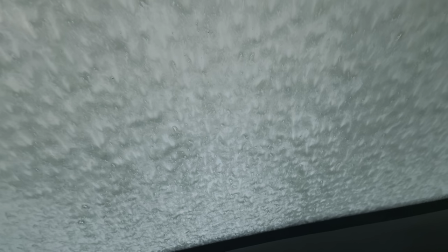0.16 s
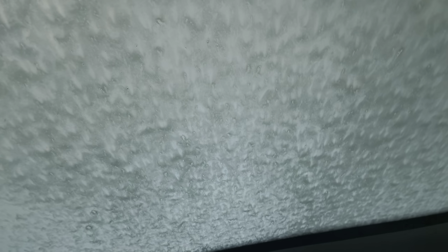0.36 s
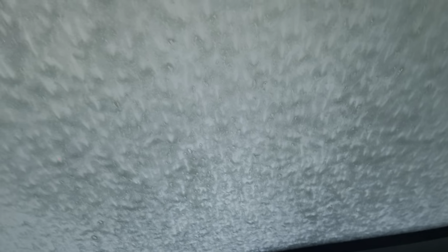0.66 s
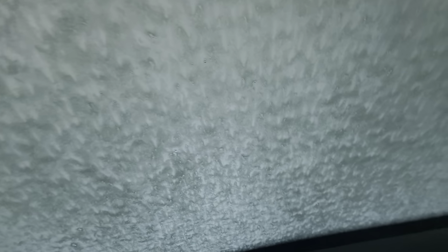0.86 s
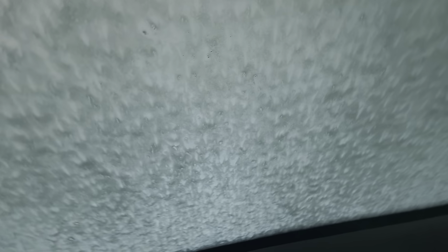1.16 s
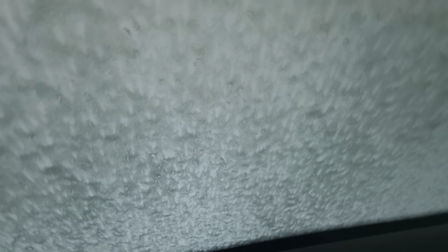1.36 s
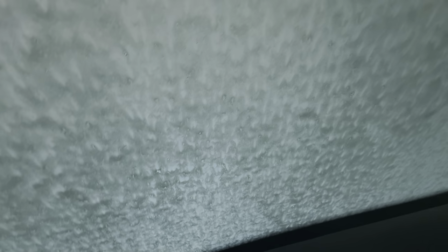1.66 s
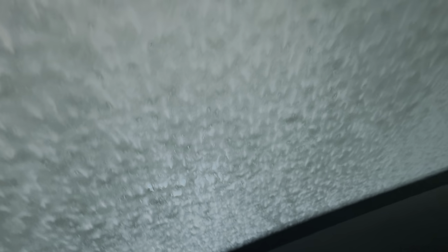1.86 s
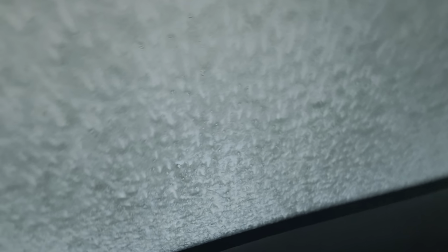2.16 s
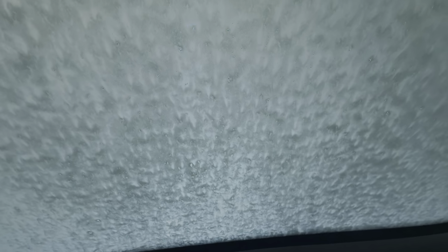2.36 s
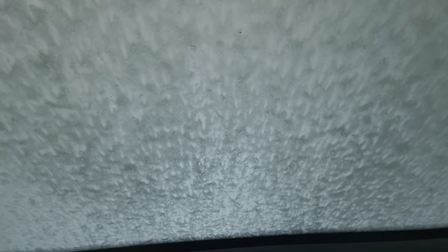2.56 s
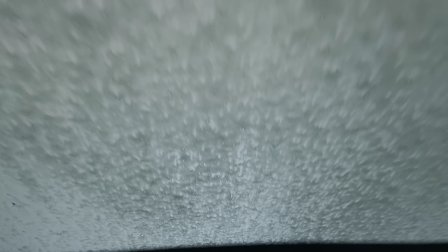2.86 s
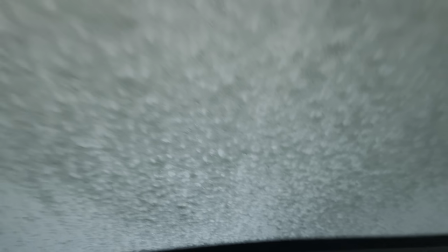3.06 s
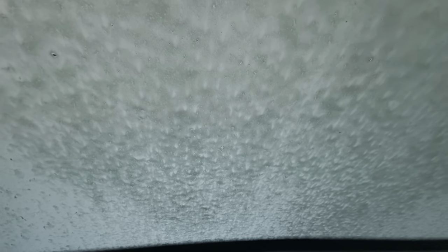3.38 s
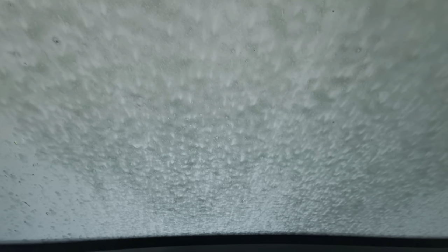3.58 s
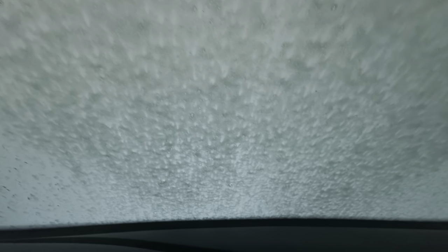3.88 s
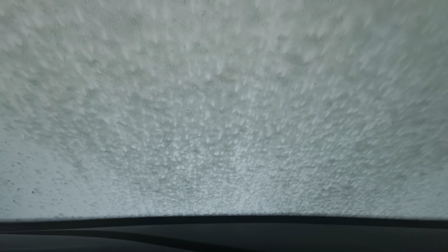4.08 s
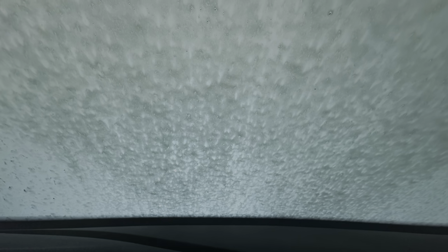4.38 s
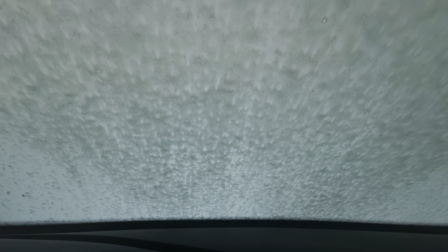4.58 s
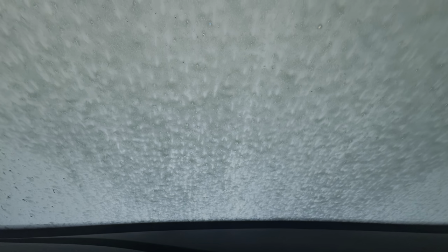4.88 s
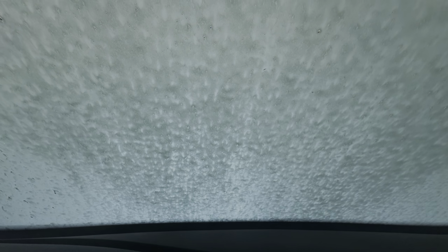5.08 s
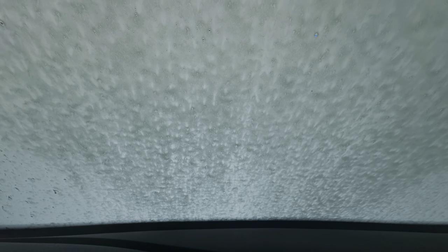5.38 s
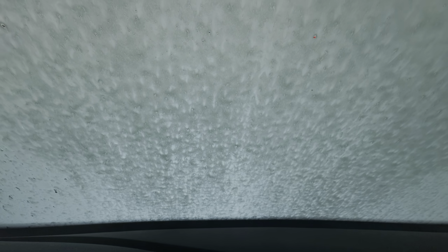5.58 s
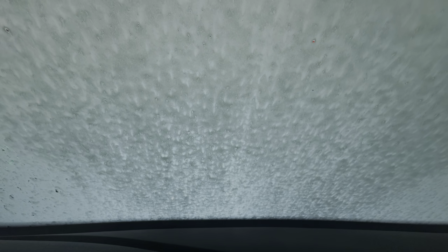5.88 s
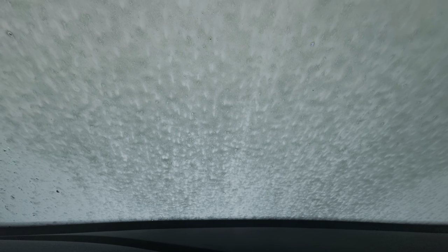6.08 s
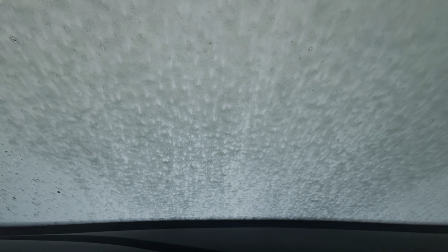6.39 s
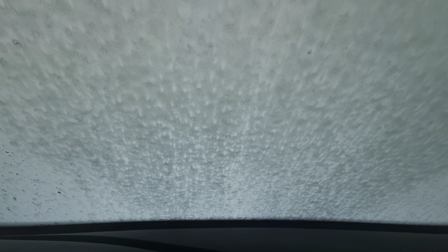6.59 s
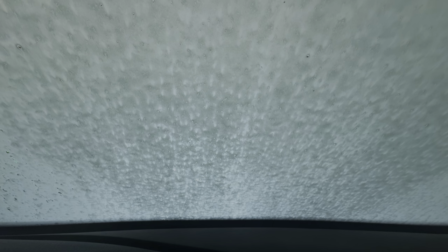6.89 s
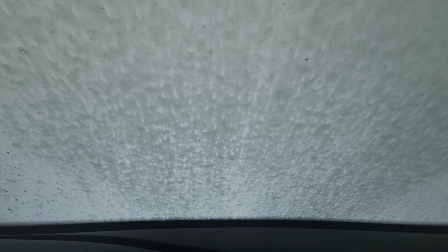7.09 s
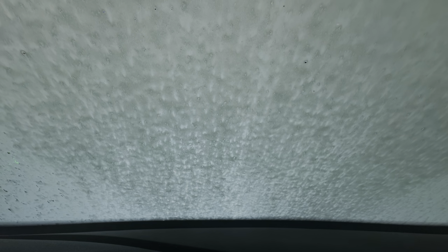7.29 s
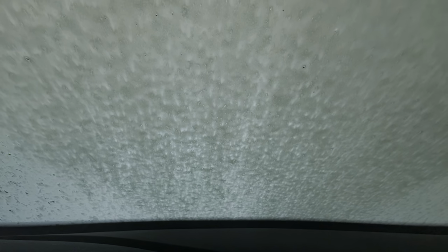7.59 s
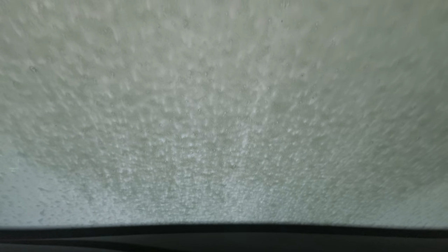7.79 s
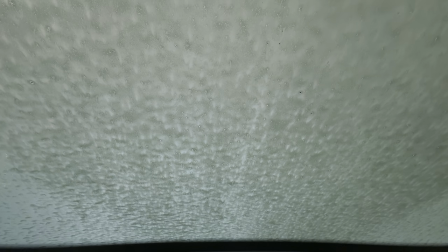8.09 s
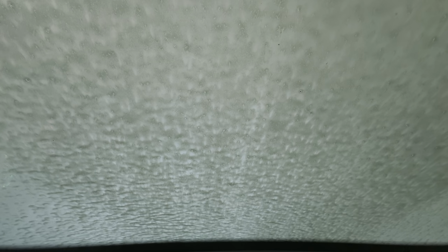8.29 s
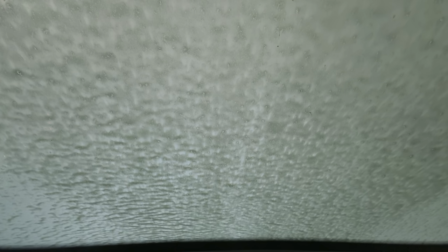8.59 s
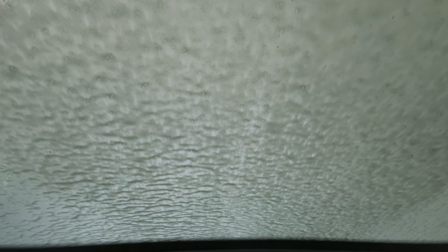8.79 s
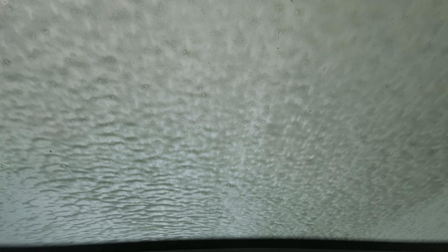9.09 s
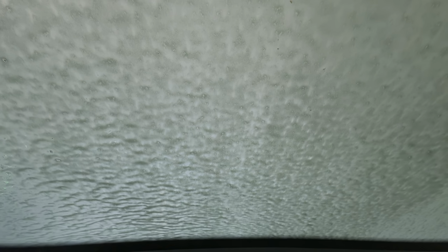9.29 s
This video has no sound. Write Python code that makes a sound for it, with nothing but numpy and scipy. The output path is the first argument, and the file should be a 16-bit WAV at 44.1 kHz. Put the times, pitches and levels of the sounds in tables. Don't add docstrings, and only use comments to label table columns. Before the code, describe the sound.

A deep, muffled idle rumble fills a closed car cabin in a wash bay, with faint fan hum. From 0 to 2 seconds cloth slides close to the microphone, with dry ticks and sharp bright snaps, the strongest near 1.15. Around 1.5 two heavy, short low knocks hit the phone amid gritty rubs. Rustling thins after 2, with a snap at 2.1, another at 2.7 and small scratches near 2.9 to 3.5. From 3.7 to 5.5 mostly gently fading rumble remains, with barely audible ticks. At about 5.6 air puffs and a pump kicks in with a low thump, its pulsing hum climbing to speed by 6.1 while hoses fill with a rising hollow roar and a thin valve whistle. Light hiss becomes full pressure spray by 7, steady over the drone, with low surges; at 9.3 the strongest boom and brightest hiss arrive, continuing to the end near 9.45.

```python
import sys
import numpy as np
from scipy import signal
from scipy.fft import rfft, irfft, next_fast_len
from scipy.io import wavfile
from scipy.ndimage import uniform_filter1d

SR = 44100
rng = np.random.default_rng(int(sys.argv[2]) if len(sys.argv) > 2 else 0)


def decibels_to_gain(level_db):
    exponent = np.asarray(level_db, float) / 20
    return 10 ** exponent


def waveform_to_disk(signal):
    frames = np.transpose(np.atleast_2d(signal))
    scaled = np.clip(frames, -1, 1) * 32767
    samples = np.round(scaled).astype(np.int16)
    wavfile.write(sys.argv[1], SR, samples)


N = 416744
SIZE = next_fast_len(N)
T = np.arange(N) / SR
HZ = np.fft.rfftfreq(SIZE, 1 / SR)


def evened(x):
    return x / np.sqrt(np.mean(x ** 2) + 1e-20)


def read(points, hz):
    f, value = np.transpose(points)
    return np.interp(np.log(hz + 1), np.log(f + 1), value)


def curves(rows, before_db=-130):
    s, first, *rest = np.transpose(rows)
    level_db = np.interp(T, s, first, before_db, before_db)
    return [level_db] + [np.interp(T, s, column) for column in rest]


def coloured(gain_db):
    white = rfft(rng.standard_normal(SIZE))
    return evened(irfft(white * decibels_to_gain(gain_db), SIZE)[:N])


def band(lo_hz, hi_hz, slope_db):
    below = np.minimum(np.log2((HZ + 1) / lo_hz), 0)
    above = np.maximum(np.log2((HZ + 1) / hi_hz), 0)
    return slope_db * (below - above)


def wander(rate_hz):
    t = T[::32]
    hz = np.fft.rfftfreq(len(t), t[1]) + 1e-3
    gain = decibels_to_gain(-27.0 * np.maximum(np.log2((hz + 1) / rate_hz), 0)) * (hz > 0.1)
    slow = irfft(rfft(rng.standard_normal(len(t))) * gain, len(t))
    return np.interp(T, t, evened(slow))


def stroke(start, length, db, rise_db, fall_db):
    t = T[::32, None]
    early = np.maximum(start - t, 0)
    late = np.maximum(t - start - length, 0)
    gain = decibels_to_gain(db - rise_db * early - fall_db * late)
    return np.interp(T, t[:, 0], gain.sum(axis=1))


def resonate(x, hz, width):
    turn = np.exp(2j * np.pi * np.cumsum(hz * np.ones(N)) / SR)
    r = np.exp(-np.pi * width / SR)
    return 2 * (turn * signal.lfilter([1 - r], [1, -r], x / turn)).real


def hiss(colour_db, tilt_db, mist_db, patchy_db, flicker_db):
    frames, hz = N // 128 + 5, np.fft.rfftfreq(512, 1 / SR)[:, None]
    a, b, patches = rng.standard_normal((frames, 257, 3)).T
    patches = uniform_filter1d(patches, size=8, axis=0)
    patches = evened(uniform_filter1d(patches, size=16, axis=1))
    flicker = evened(uniform_filter1d(rng.standard_normal(frames), size=3))
    tilt, mist = (np.interp(np.arange(frames) * 128, np.arange(N), c) for c in (tilt_db, mist_db))
    gain = decibels_to_gain(np.interp(hz, HZ, colour_db) + tilt * np.log2((hz + 200) / 6000))
    gain /= np.sqrt(np.mean(gain ** 2, axis=0))
    uneven_db = patchy_db * patches + flicker_db * flicker + mist * (hz > 9650)
    z = (a + 1j * b) * gain * decibels_to_gain(uneven_db)
    return signal.istft(z, nperseg=512, noverlap=384)[1][:N] / 20


FILL_START_S, FILL_TOP_HZ = 5.57, 1500.0


def fill_hz(t):
    return np.clip(260.0 + 2200.0 * (t - FILL_START_S), 200, FILL_TOP_HZ)


# (frequency [Hz], level [dB per Hz])
CABIN_RUMBLE = [(15, -30.5), (25, -6.5), (49, -1.5), (87, -4), (161, -13.5), (184, -23), (268, -24.5),
                (350, -25.5), (456, -24.5), (545, -34), (812, -44), (1210, -46), (1320, -47.5),
                (1480, -51.5), (5000, -75), (6500, -100), (11000, -120)]
# (frequency [Hz], level [dB per Hz])
PUMP_DRONE = [(76, -5.5), (130, -8.5), (156, -9), (205, -8.5), (549, -25.5), (652, -26), (792, -27),
              (868, -27.5), (2000, -48), (2600, -79), (4400, -120)]
# (frequency [Hz], width [Hz], level [dB])
FAN_HUM = [(48.05, 4.5, -48), (93.8, 1.9, -61.5), (158.7, 6.0, -60), (265.4, 9.2, -64.5), (810, 12.3, -82),
           (1349, 30, -85.5)]
# (start [s], length [s], boom level [dB])
SURGES = [
    (1.52, .05, -36),
    (5.695, 0.041, -33),
    (7.128, 0.036, -35),
    (7.42, 0.092, -35),
    (8.4, 0.038, -37.5),
    (8.623, 0.073, -39),
    (8.848, 0.26, -36.5),
    (9.283, 0.11, -28),
]


def bay():
    effort_db = np.maximum(curves(SPRAY)[0] + 55.5, -8.0)
    on = np.clip((T - 5.62) / 0.09, 0, 1)
    surge = stroke(*np.transpose(SURGES), rise_db=90.0, fall_db=118) ** 2

    rest = decibels_to_gain(-38.5 - 0.77 * T)
    run = on * decibels_to_gain(-39 + 0.028 * effort_db)
    boom = np.sqrt(np.maximum(rest, run) ** 2 + surge)
    idle = boom * decibels_to_gain(0.6 * wander(1.8)) * coloured(read(CABIN_RUMBLE, HZ))

    lines = sum(decibels_to_gain(db) / np.sqrt(width) / (1 + (2 * (HZ - hz) / width) ** 2) for hz, width, db in FAN_HUM)
    fans = decibels_to_gain(-47.5) * coloured(20 * np.log10(lines))
    bay_hiss = decibels_to_gain(-90.0 + 2.5 * wander(14.0)) * coloured(band(2500, 3220, 45.0))

    hz, t, z = signal.stft(coloured(read(PUMP_DRONE, HZ)), SR, nperseg=1024)
    filling_hz = np.where(fill_hz(t) < FILL_TOP_HZ, fill_hz(t), 4000)
    edge_hz = np.where(t < FILL_START_S, 900, filling_hz)
    z = z / np.sqrt(1 + (hz[:, None] / (1.1 * edge_hz)) ** 8)
    drone = signal.istft(z, SR, nperseg=1024)[1][:N]
    push = decibels_to_gain(-53.5 - 1.1 * T) + on * decibels_to_gain(-40.5 + 0.35 * effort_db)
    push = np.sqrt(push ** 2 + surge * decibels_to_gain(2 * -14.5))
    return idle + fans + bay_hiss + push * decibels_to_gain(1.1 * wander(6.1)) * drone


def snap(db, low_db, ring_hz, t60, tail_db):
    draw = rng.standard_normal(8192)
    t, hz = np.arange(8192) / SR, np.fft.rfftfreq(8192, 1 / SR)
    rings = decibels_to_gain(4.14 * evened(uniform_filter1d(draw[:len(hz)], size=36)))
    ring = 0.7 / (1 + ((hz - ring_hz) / (0.12 * ring_hz)) ** 2)
    bright = 1 / (1 + (3000 / (hz + 1)) ** 4) + ring
    body = decibels_to_gain(low_db + 25.5) / (1 + (750 / (hz + 1)) ** 4 + (hz / 1250) ** 2.74)
    crack = irfft(rfft(np.sign(draw)) * bright) * 1.5 * np.exp(-t / 0.0006)
    fade = decibels_to_gain(tail_db - 60 * t / t60) * (1 - np.exp(-t / 0.002))
    tail = fade * irfft(rfft(draw) * (bright + body) * rings)
    return decibels_to_gain(db - 5.5) * (1 - np.exp(-t / 0.0002)) * (crack + tail)


# (time [s], level [dB])
CLOTH_BED = [
    (0, -55),
    (.5, -59.5),
    (1.1, -62),
    (1.8, -63.5),
    (2.05, -72),
    (2.7, -83.5),
    (3.0, -75),
    (3.5, -78),
    (3.68, -92),
]
# (start [s], length [s], level [dB], low body [dB])
RUBS = [(0.19, .05, -60, 1), (1.247, 0.082, -56.5, -1), (1.374, 0.09, -54, -10), (1.453, 0.045, -55, 1),
        (1.497, 0.041, -53, 4), (1.515, .04, -61, 7), (2.3, 0.069, -68, -5), (2.525, 0.041, -64.5, -8),
        (2.584, 0.063, -68, -8), (2.907, 0.031, -42, -13), (2.96, 0.06, -62.5, -12),
        (3.05, .015, -54.5, 1.5), (3.108, .05, -52.5, -6.5), (3.297, 0.011, -48, -5.5),
        (3.34, 0.016, -55, -2), (3.404, 0.024, -64.5, -1), (3.532, 0.03, -74, 2)]
# (start [s], length [s], level [dB])
SWISHES = [
    (1.172, .015, -65),
    (1.44, 0.027, -61),
    (1.497, 0.018, -59),
    (1.532, 0.021, -64),
    (1.594, 0.012, -55.5),
    (2.52, .11, -73.5),
    (2.717, 0.01, -71),
    (3.048, 0.017, -70),
    (3.294, 0.023, -67),
]
# (time [s], peak [dB], low body [dB], ring [Hz])
SNAPS = [(0.7914, -34.5, -11, 8650), (0.9928, -34, -16, 6900), (1.0889, -52, 2, 6560),
         (1.15, -19.5, -21, 7400), (1.1699, -35, 3.5, 2930), (1.2115, -32, -11.5, 8580),
         (1.305, -35, -11, 6300), (1.531, -47, 14, 2380), (1.5548, -32, -20, 11560),
         (1.824, -35.5, -13, 12300), (2.0212, -34, -8.5, 2520), (2.122, -24.5, -15.5, 11700),
         (2.7117, -28.5, -13.5, 12750), (3.2245, -49, -18, 12500), (3.5847, -55, -11.5, 12700),
         (4.3181, -54.5, -25, 7900)]
# (time [s], peak [dB], low body [dB], ring [Hz])
TICKS = [(0.2713, -46, 2, 3380), (0.3107, -34, -6, 11800), (0.383, -42, -23, 7100),
         (0.5556, -30, -4.5, 3720), (0.938, -30.5, -6.5, 3620), (0.9493, -40, -3, 3460),
         (0.9614, -45, 1, 3480), (4.099, -66, 2, 3010), (4.2672, -65, 0, 12500), (4.41, -63, -8, 12000),
         (4.555, -65, -4, 12000), (5.1077, -55.5, -11, 3200), (5.2775, -65, 4, 3200)]
# (time [s], peak [dB], low body [dB], ring [Hz])
SOFT_SNAPS = [
    (1.333, -36.5, -17, 11700),
    (1.491, -39, 0, 2600),
    (1.593, -49, 5, 2610),
    (2.1182, -32.5, -21, 8040),
    (3.0498, -51, -17, 12800),
    (3.2933, -55, -10, 2290),
]


def cloth():
    bed = decibels_to_gain(curves(CLOTH_BED)[0] + 0.43 * wander(8.7))
    out = bed * hiss(band(900, 14400, 7.0), np.zeros(N), np.full(N, 1.5), patchy_db=1.0, flicker_db=1.0)

    grit = decibels_to_gain(1.5 * wander(150.0))
    rise_db, fall_db = 1302, 799.5
    bright, body = coloured(band(10200, 18000, 3.4)), coloured(band(290, 760, 11.0))
    start, length, db, low_db = np.transpose(RUBS)
    out += grit * stroke(start, length, db - 6.5, rise_db, fall_db) * bright
    out += grit * stroke(start, length, db + low_db - 2.5, rise_db, fall_db) * body
    swish = stroke(*np.transpose(SWISHES), rise_db, fall_db)
    out += grit ** 2 * swish * coloured(band(960, 2200, 30.0))

    for rows, t60, tail_db in ((SNAPS, 0.052, -10), (TICKS, 0.028, -8.5), (SOFT_SNAPS, 0.06, 1.4)):
        for s, db, low_db, ring_hz in rows:
            out[round(s * SR):][:8192] += snap(db, low_db, ring_hz, t60, tail_db)
    return out


# (time [s], peak [dB], ring [Hz], t60 [s])
BUMPS = [
    (1.484, -12, 83, 0.054),
    (1.535, -6.5, 118.6, 0.055),
    (5.73, -37, 51.4, 0.14),
]


def bumps():
    out, t = np.zeros(N), np.arange(SR // 3) / SR
    for s, db, hz, t60 in BUMPS:
        envelope = (1 - np.exp(-t / 0.011)) * decibels_to_gain(db + 3.0 - 60 * t / t60)
        out[round(s * SR):][:len(t)] += envelope * np.sin(2 * np.pi * hz * t)
    return out


# (start [s], length [s], level [dB], rise [dB/s], fall [dB/s])
AIR_PUFFS = [
    (4.42, .03, -82, 900, 250),
    (5.56, .12, -77.5, 1000, 130),
]
# (frequency [Hz], width [Hz], level [dB])
WHISTLE_TONES = [(5770, 260, 6), (11800, 450, 2)]


def start_up():
    air = stroke(*np.transpose(AIR_PUFFS)) * coloured(band(2000, 4100, 20.0))

    noise, centre_hz = rng.standard_normal(N), fill_hz(T)
    roar = evened(resonate(resonate(noise, centre_hz, 300), centre_hz, 240))
    filling = stroke(5.87, 0.17, -55.5, rise_db=25.0, fall_db=90.0)
    filling = filling * np.clip((T - FILL_START_S) * 20, 0, 1)

    tones = sum(decibels_to_gain(db) * coloured(-20 * np.log10(1 + (2 * (HZ - hz) / width) ** 2))
                for hz, width, db in WHISTLE_TONES)
    opening = stroke(5.79, 0.02, -76.0, rise_db=1600.0, fall_db=20.0) * (T < 5.96)
    return air + filling * roar + opening * tones


# (time [s], speed [Hz])
SHAFT = [
    (5.5, 9.5),
    (5.6, 10.5),
    (6.05, 11.7),
    (6.15, 13.5),
    (6.85, 13.47),
    (7.0, 13.31),
    (9.45, 13.31),
]
# (time [s], level [dB])
RUN_UP = [
    (5.5, -65),
    (5.62, -40),
    (5.9, -12),
    (6.1, -5.5),
    (6.25, -5),
    (6.9, -6),
    (7.05, -3),
]
# (order [per turn], level [dB])
ORDERS = [(3, 0), (6, 6), (12, -2), (15, 4.5), (18, 0), (24, -6), (27, -5), (30, -5), (33, -8), (36, -8),
          (45, -14), (48, -7), (50, -10), (51, -8), (54, -10), (64, -8.5), (67, -11), (70, -10), (73, -15),
          (81, -15), (84, -14), (86, -16), (88, -16), (92, -16), (104, -16)]
# (time [s], level [dB])
HUM = [
    [(5.5, -49), (5.616, -36.5), (5.886, -51), (5.908, -40), (6.068, -38), (6.116, -28), (6.354, -33),
     (6.388, -41), (6.9, -44)],
    [(6.9, -48), (7.03, -33), (7.49, -33), (7.53, -27.5), (7.94, -26.5), (7.98, -29), (9.28, -27.5),
     (9.33, -21), (9.45, -46)],
]


def pump():
    hum_db = curves(list(HUM[0]) + list(HUM[1]))[0]
    firm_db = np.interp(T, *np.transpose(RUN_UP))
    shaft_hz, waver = np.interp(T, *np.transpose(SHAFT)), 1 + 0.0014 * wander(3.0)
    gear_hz = np.minimum(shaft_hz, 13.31)
    turns, gear = (2 * np.pi * np.cumsum(hz * waver) / SR for hz in (shaft_hz, gear_hz))

    hum_db = hum_db + 3.5 + np.maximum(firm_db * 0.11, -3.0) + 1.2 * wander(31.0)
    hum = decibels_to_gain(hum_db) * np.sin(9 * turns) * np.clip((T - 5.5) / 0.06, 0, 1)

    beats = [decibels_to_gain(2.0 * wander(3.5)) for _ in range(4)]
    rest = np.zeros(N)
    for k, (order, db) in enumerate(ORDERS):
        angle = turns if order < 60 else gear
        rest += decibels_to_gain(db) * beats[k % 4] * np.sin(order * angle + k ** 2)
    return hum + decibels_to_gain(-47.5 + firm_db) * rest


# (time [s], level [dB], brightness [dB per octave], finest mist [dB])
SPRAY = [(5.76, -86, 6, -19), (5.8, -64.5, -5, -11), (5.9, -64.5, -6.5, -1.5), (6.01, -56, -0.5, -11.5),
         (6.65, -57.5, -3.5, -1.5), (6.91, -53.5, -2.5, -7), (7.02, -45, -2, -11), (8.34, -46, -1.5, -14),
         (8.8, -45.5, -1, -14), (9.2, -42.5, -0.5, -11), (9.38, -37.5, 0.9, -12.5), (9.45, -40, 0.5, -12.5)]
# (frequency [Hz], width [Hz], level [dB])
PANELS = [(2167, 330, 5), (3190, 110, 7), (3610, 43, 7.5), (5400, 137, 1), (7400, 230, -13.5)]


def spray():
    level_db, tilt_db, mist_db = curves(SPRAY)
    panels = sum(decibels_to_gain(db) / (1 + (2 * (HZ - hz) / width) ** 2) for hz, width, db in PANELS)
    colour_db = band(1460, 18300, 3.5) + 20 * np.log10(0.61 + 0.22 * panels)
    return decibels_to_gain(level_db + 4.0) * hiss(colour_db, tilt_db, mist_db + 8.5, patchy_db=0.55, flicker_db=0.5)


def scene():
    return (bay() + cloth() + bumps() + start_up() + pump() + spray())[None]


def drop_weak_bands(x, under_db, top_db):
    hz, _, z = signal.stft(x, SR, nperseg=1024)
    hz = hz[:512, None]
    power = uniform_filter1d(abs(z) ** 2, size=3, axis=1)
    bands = power[:512].reshape(128, 4, -1).mean(axis=1)
    chance = rng.standard_normal(bands.T.shape).T
    margin_db = 2.7 * evened(uniform_filter1d(chance, size=9, axis=1))
    bands = np.repeat(bands * decibels_to_gain(2 * margin_db), 4, axis=0)
    around = uniform_filter1d(power, size=121, axis=0)[:512]
    strong = bands > around * decibels_to_gain(-2 * under_db)
    loud = (bands > decibels_to_gain(2 * top_db)) | (hz < 14300)
    z[:512] *= (strong & loud) | (hz < 8500)
    return signal.istft(z, SR, nperseg=1024)[1][:N]


def top_cut(x):
    return signal.sosfilt(signal.butter(12, 16180, fs=SR, output="sos"), x)


# (frequency [Hz], gain [dB])
PORT = [(16, -34.5), (28, -10.5), (42, -1.5), (8300, 3.5), (8900, 0.5), (9350, -16.5), (9650, -17.5),
        (9950, -7.5), (11300, 3.5), (12500, 5), (13800, -1.5), (14450, -16), (14750, -24), (15050, -8),
        (15700, -11.5)]


def record(dry):
    self_noise = decibels_to_gain(-88.0) * coloured(band(3000, 14000, 3.6))
    port = decibels_to_gain(read(PORT, HZ)) * (HZ < 15760)
    heard = irfft(rfft(dry[0] + self_noise, SIZE) * port, SIZE)[:N]
    mix = drop_weak_bands(heard, under_db=21.0, top_db=-104.0)[None]
    return top_cut(mix)


dry = scene()
out = record(dry)
waveform_to_disk(out)
```